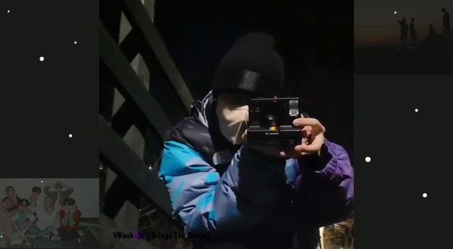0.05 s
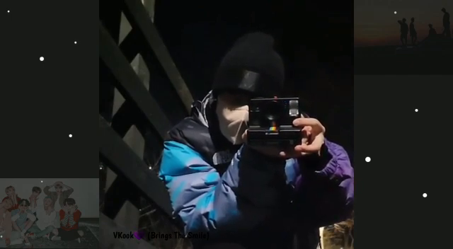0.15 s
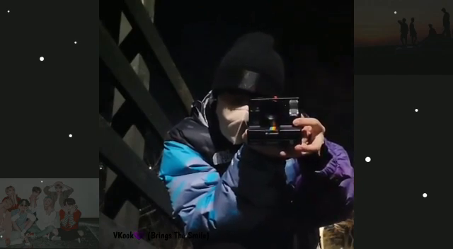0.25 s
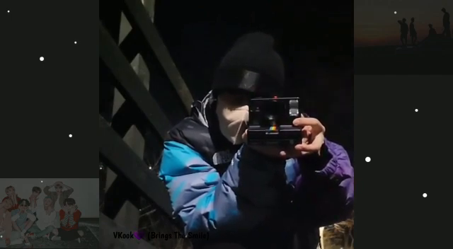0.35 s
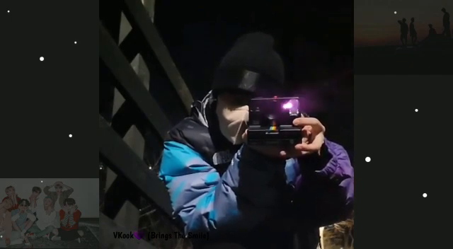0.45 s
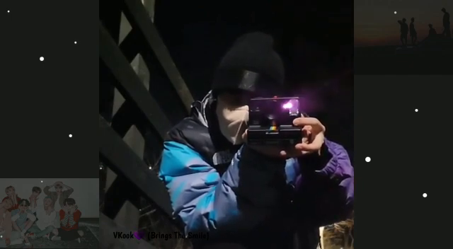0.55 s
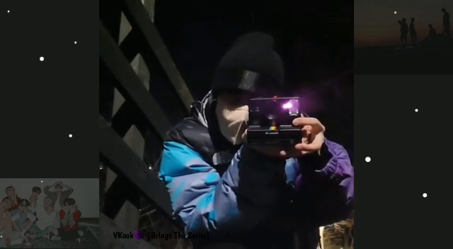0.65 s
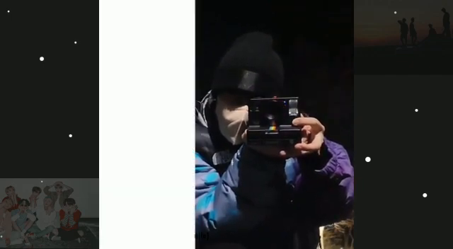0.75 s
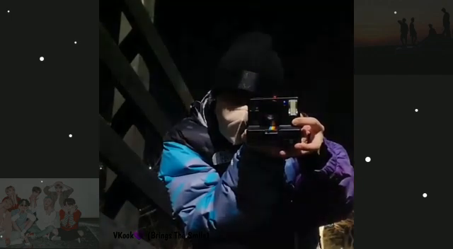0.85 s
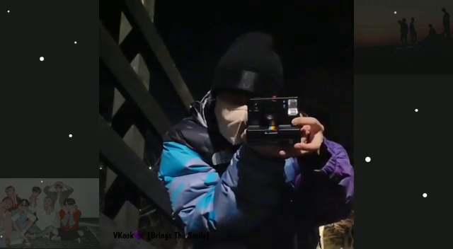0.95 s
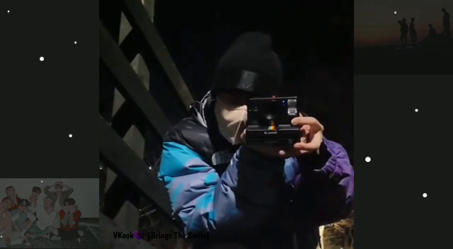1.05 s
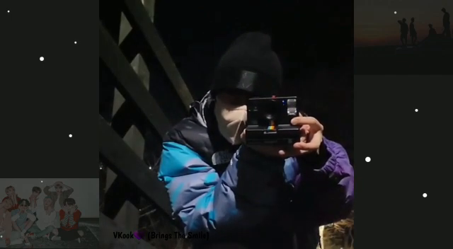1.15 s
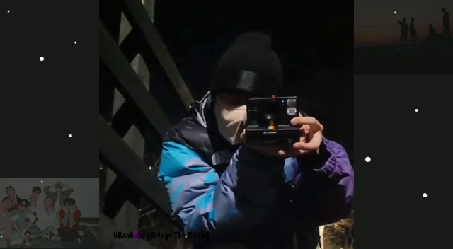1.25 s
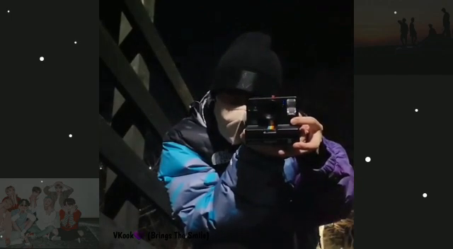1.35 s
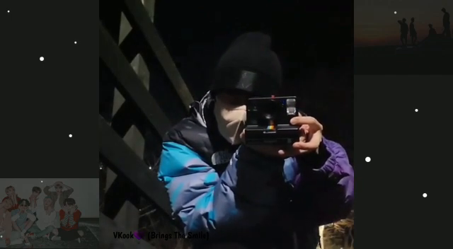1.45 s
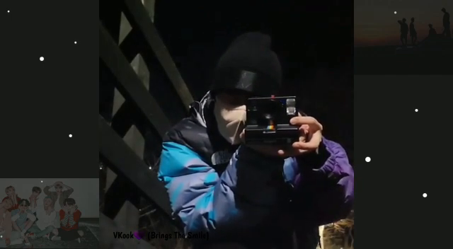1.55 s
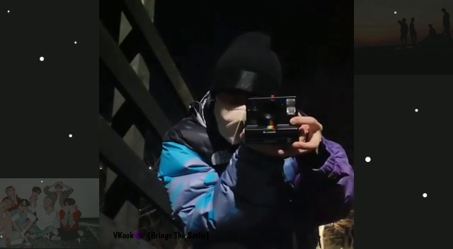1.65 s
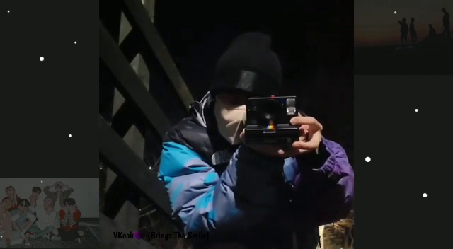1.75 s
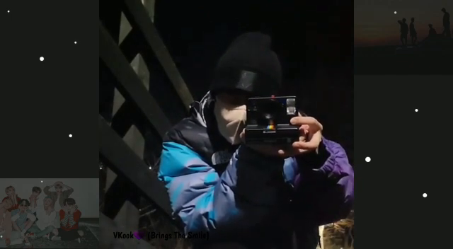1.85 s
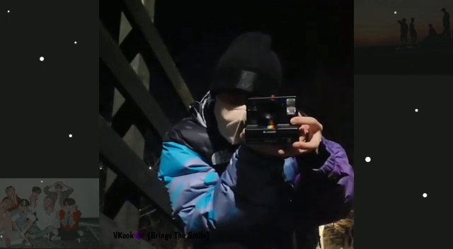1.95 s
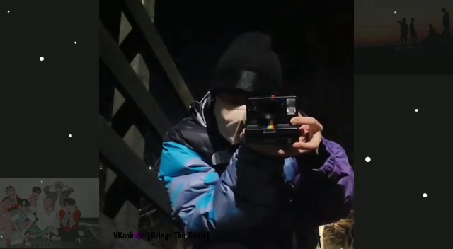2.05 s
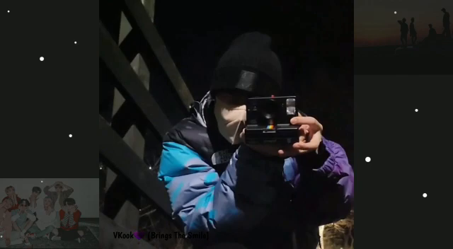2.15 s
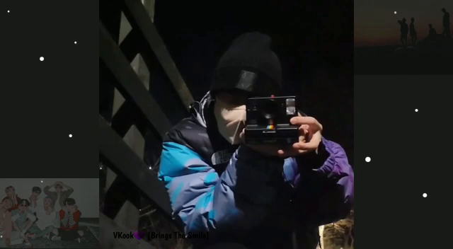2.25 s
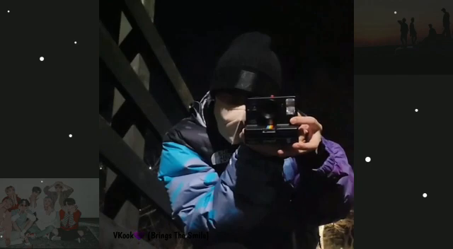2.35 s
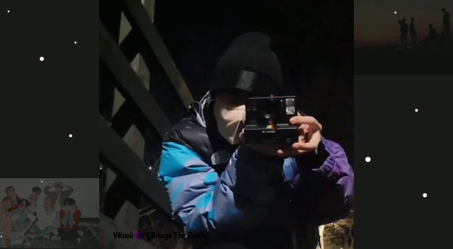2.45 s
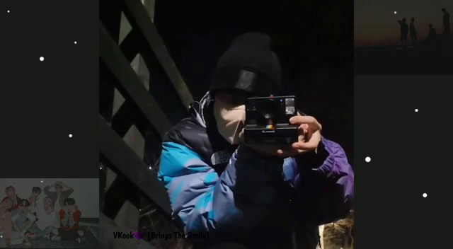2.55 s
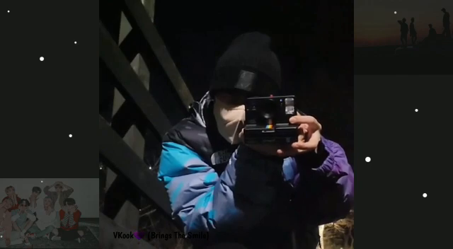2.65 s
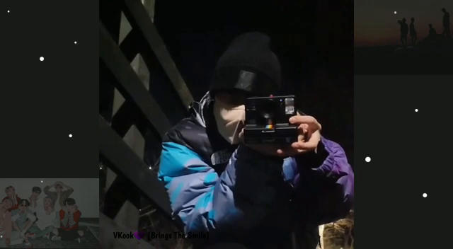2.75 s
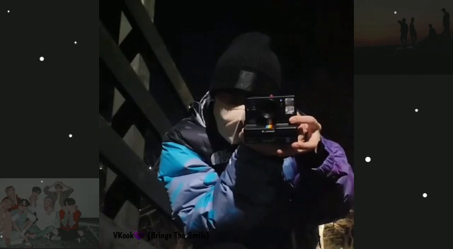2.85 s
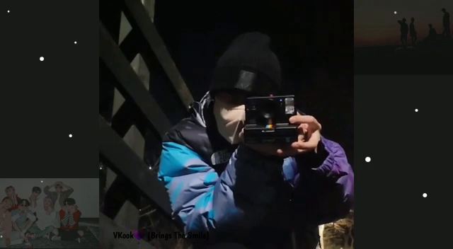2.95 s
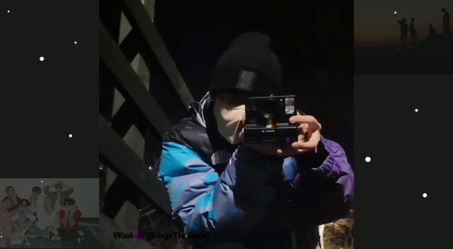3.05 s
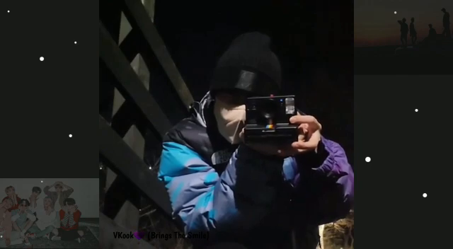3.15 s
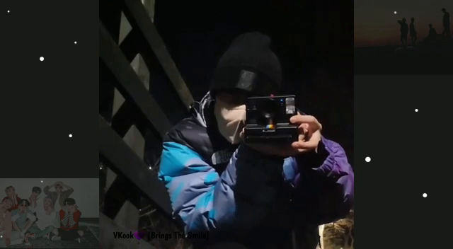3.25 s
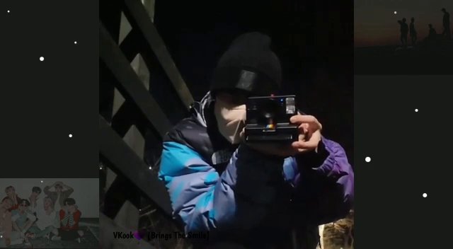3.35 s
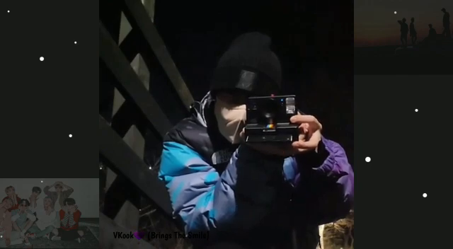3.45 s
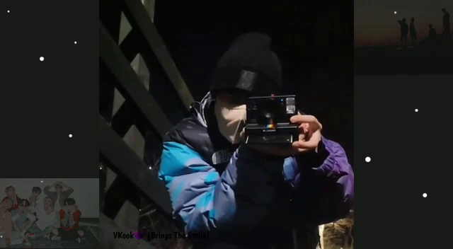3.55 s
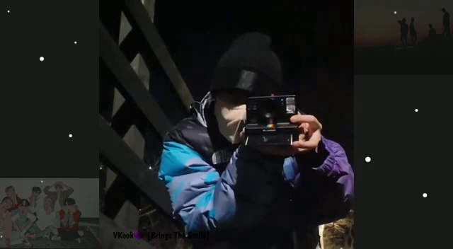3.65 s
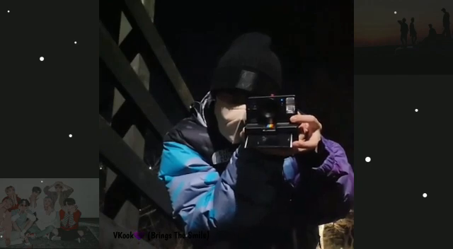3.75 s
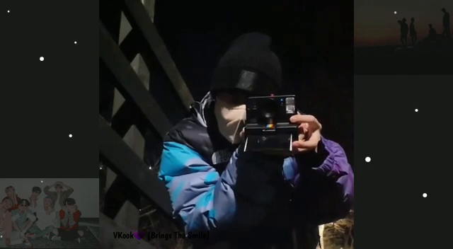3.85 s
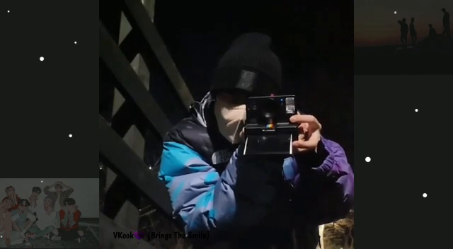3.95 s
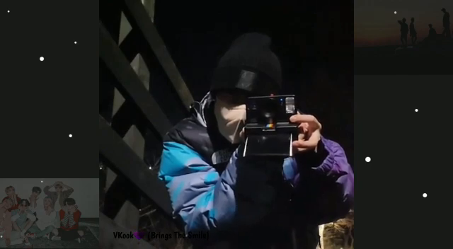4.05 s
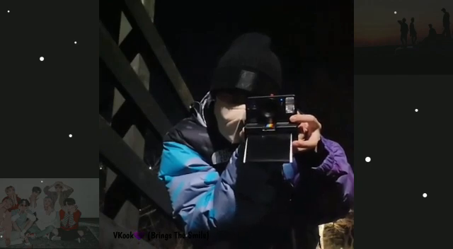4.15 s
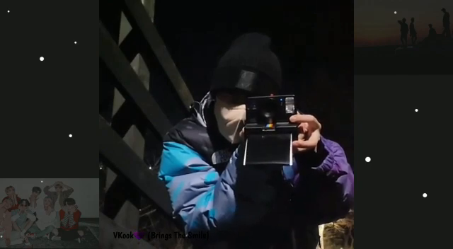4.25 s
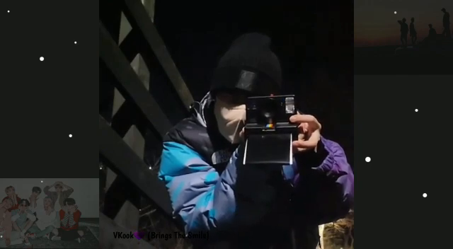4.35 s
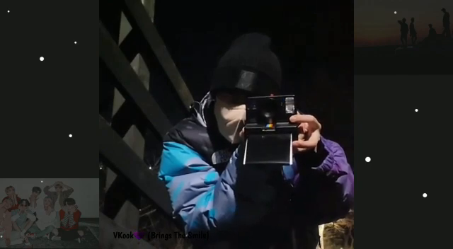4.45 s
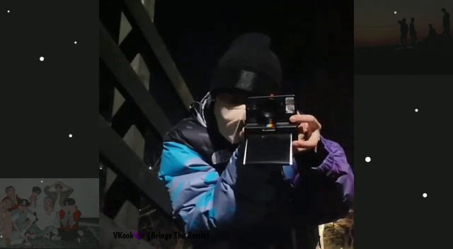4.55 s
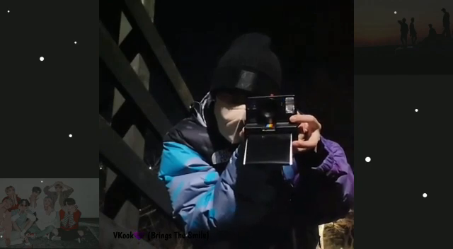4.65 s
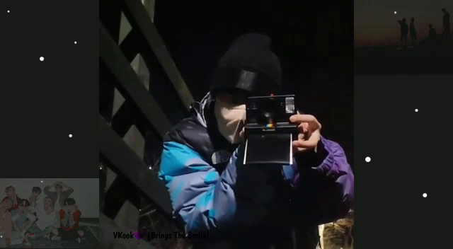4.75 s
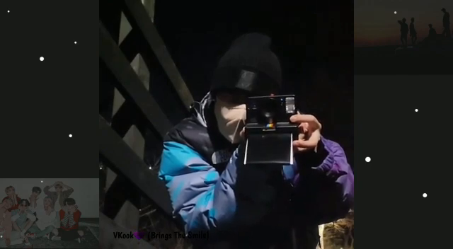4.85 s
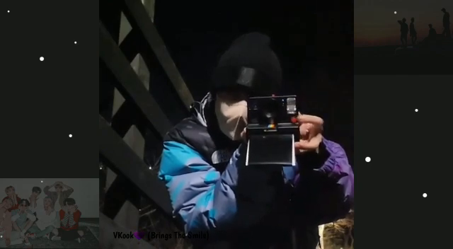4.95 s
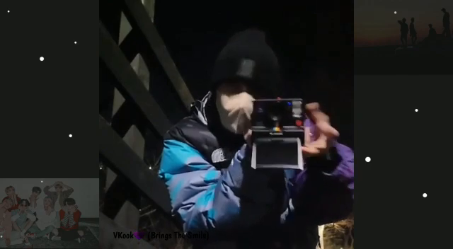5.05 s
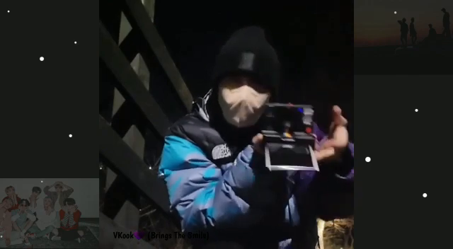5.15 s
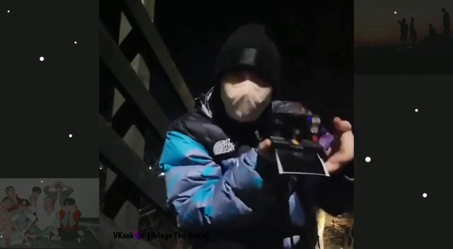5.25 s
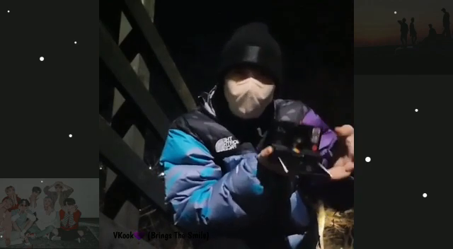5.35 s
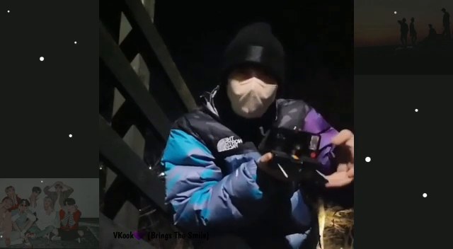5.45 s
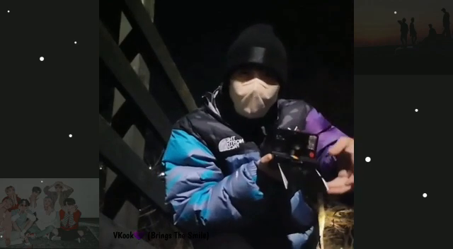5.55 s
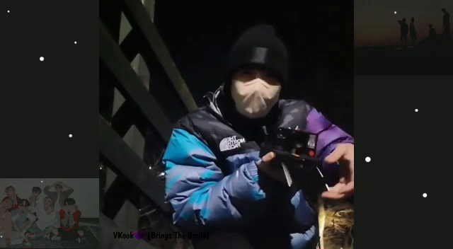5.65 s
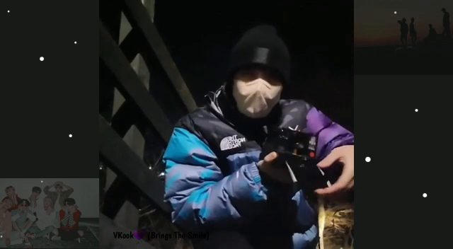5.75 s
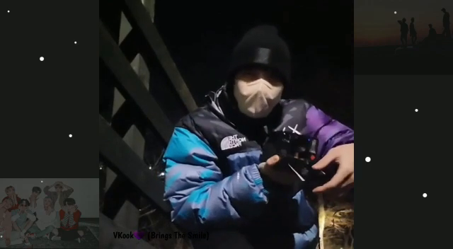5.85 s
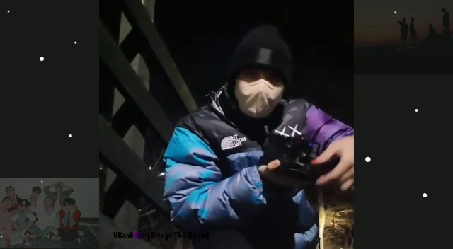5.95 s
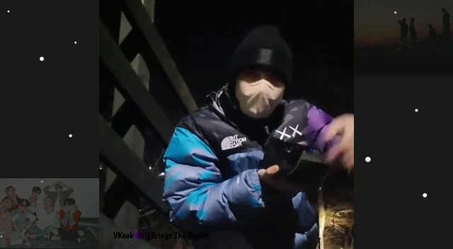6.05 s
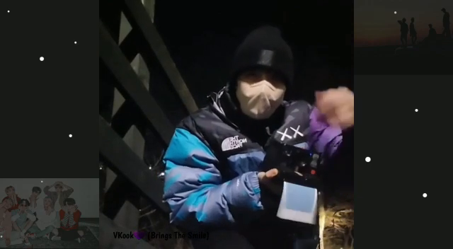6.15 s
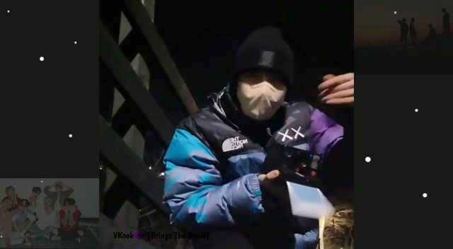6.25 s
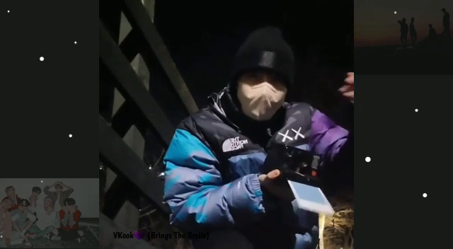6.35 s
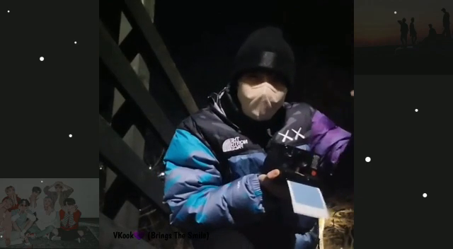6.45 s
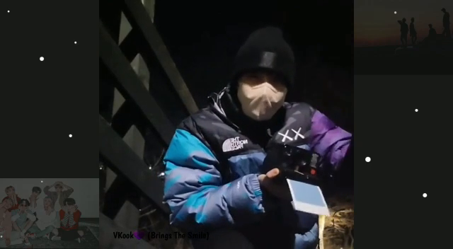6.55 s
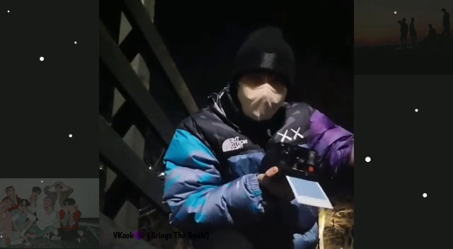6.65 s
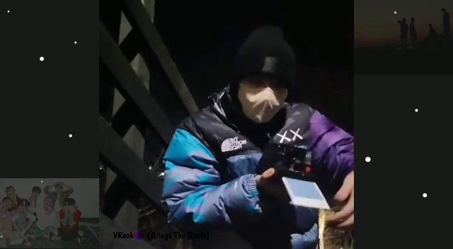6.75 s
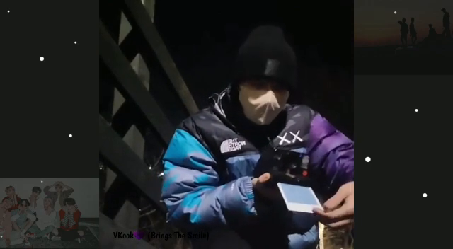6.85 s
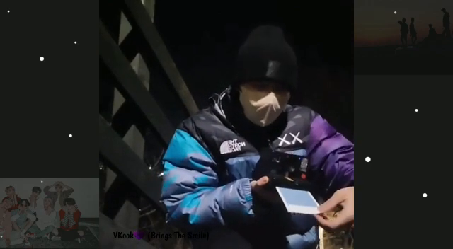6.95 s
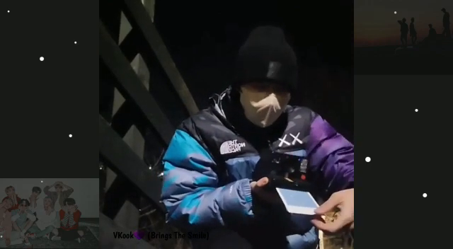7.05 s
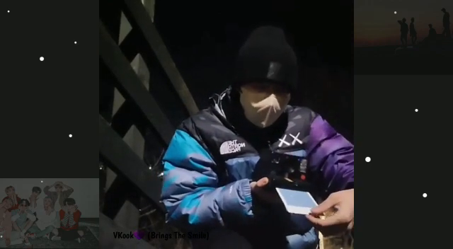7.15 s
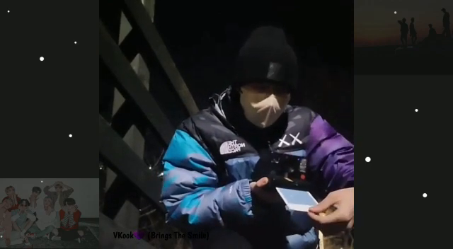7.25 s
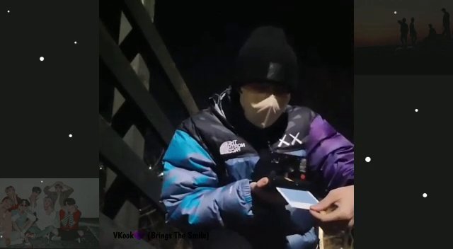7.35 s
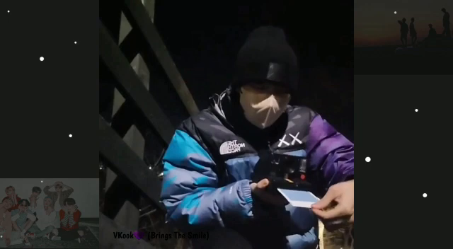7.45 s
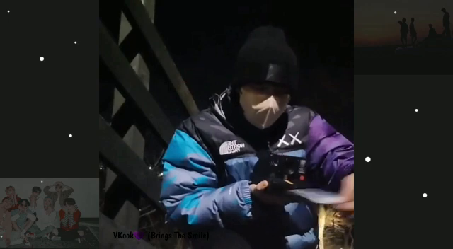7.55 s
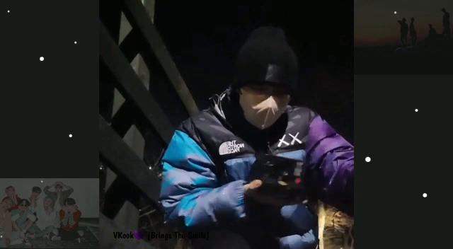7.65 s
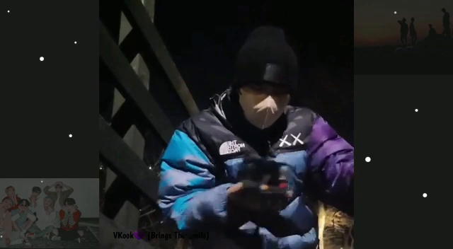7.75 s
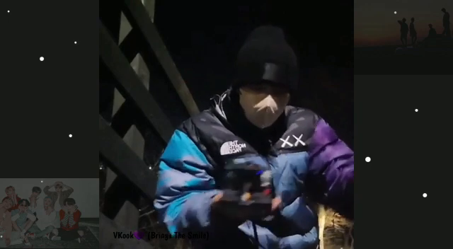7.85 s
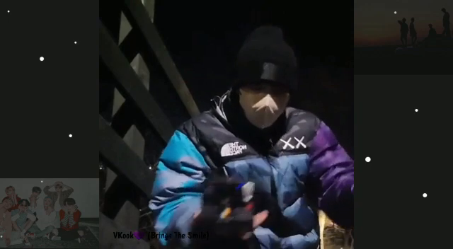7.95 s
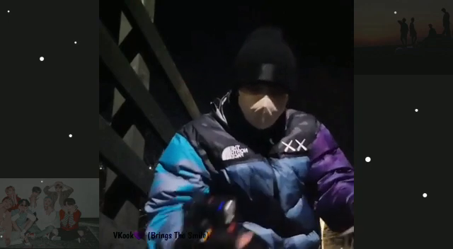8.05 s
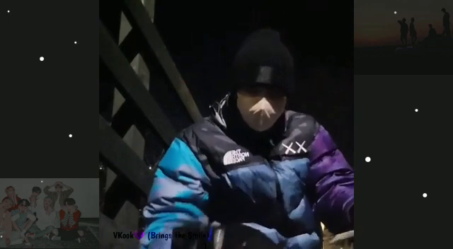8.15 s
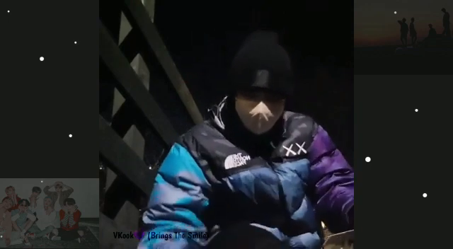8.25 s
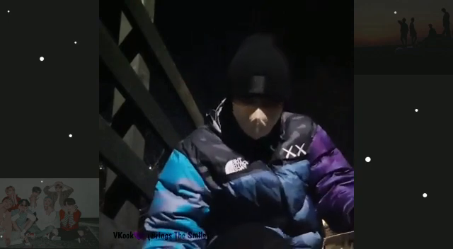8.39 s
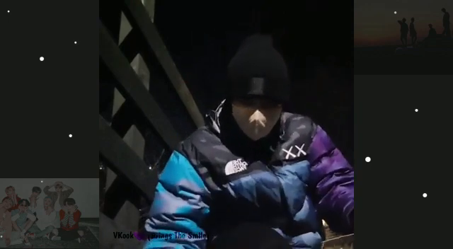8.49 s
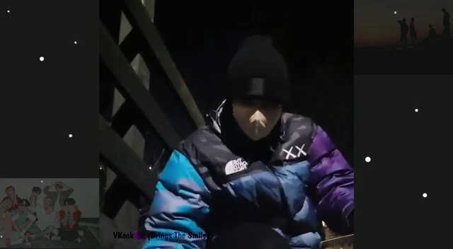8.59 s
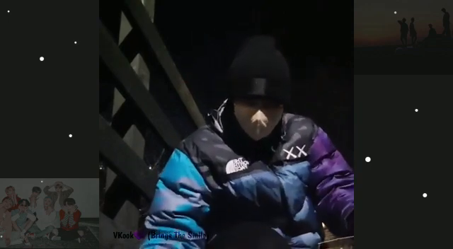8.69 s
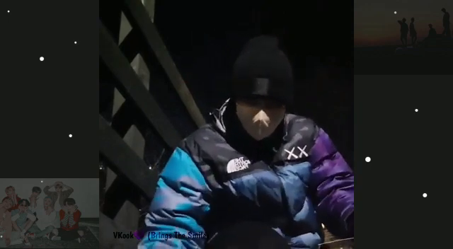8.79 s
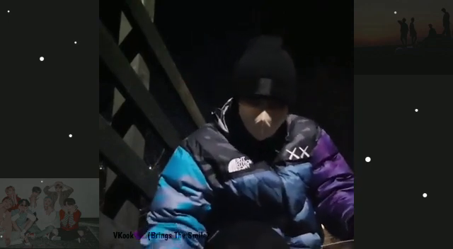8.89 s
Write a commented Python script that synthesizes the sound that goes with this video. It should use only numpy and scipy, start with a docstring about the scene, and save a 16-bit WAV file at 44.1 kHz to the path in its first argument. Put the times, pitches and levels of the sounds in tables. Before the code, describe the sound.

Quiet outdoor night with faint low traffic, heard close by a stereo microphone. Tiny shutter ticks come first, then after a pause a thin gear motor whirrs, drops in pitch at a sharp latch click, labours while rolling out a print, speeds up and dies. Afterwards a padded jacket rustles, the plastic camera clicks and knocks in the hands, ending with soft dull thumps.

```python
"""A small geared motor in an instant camera whines, bogs down, latches and rolls the print out, outdoors at night.
Shaft and tooth harmonics plus grinding noise make the motor; ringing modes make the shutter ticks before it.
Hands click and knock the plastic housing: short noise bursts, ringing modes and low decaying sines.
A padded jacket rustles in flickering noise bands; filtered noise makes far traffic, sines a brief hum and a
faint toot. A close two-port microphone hears it all."""
import sys
import numpy as np
from scipy import signal
from scipy.fft import rfft, irfft
from scipy.io import wavfile
from scipy.ndimage import uniform_filter1d

SR = 44100
rng = np.random.default_rng(int(sys.argv[2]) if len(sys.argv) > 2 else 0)


def invert_db(level):
    """Linear amplitude ratio for a level in decibels (20 dB per decade), elementwise."""
    return 10 ** (np.asarray(level, dtype=float) / 20)


def waveform_to_disk(signal):
    """Save audio, clipped to [-1, 1], as 16-bit WAV at the path in sys.argv[1]."""
    frames = np.transpose(np.atleast_2d(signal))
    scaled = np.clip(frames, -1, 1) * 32767
    samples = np.round(scaled).astype(np.int16)
    wavfile.write(sys.argv[1], SR, samples)


N = 393372
TOP_HZ = 12820
TEETH = 11


def unit(x):
    """Scale to rms 1."""
    return x / np.sqrt(np.mean(x ** 2))


def gain_at(hz, points):
    """Gain of a (Hz, dB) spectrum, interpolated over log frequency."""
    f, db = np.transpose(points)
    return invert_db(np.interp(np.log(np.maximum(hz, 1)), np.log(f), db))


def colour(x, points):
    """Filter by a (Hz, dB) spectrum."""
    size = x.shape[-1]
    hz = np.arange(size // 2 + 1) * SR / size
    return irfft(rfft(x) * gain_at(hz, points), size)


def band(x, lo_hz, hi_hz):
    """Causal band-pass."""
    return signal.sosfilt(signal.butter(2, [lo_hz, hi_hz], "band", fs=SR, output="sos"), x)


def columns(table, t):
    """Curves read at times t."""
    s, *rest = np.transpose(table)
    return [np.interp(t, s, c) for c in rest]


def walk(rate_hz, size=N):
    """Slow chance of rms 1: random steps, smoothed twice."""
    k = int(SR / rate_hz)
    steps = np.repeat(rng.standard_normal(size // k + 1), k)
    return unit(uniform_filter1d(uniform_filter1d(steps, k), k)[:size])


def decay(t, t60_s):
    """Exponential fall of 60 dB in t60_s."""
    return np.exp(-np.log(1000) * t / t60_s)


def ports(x, pan_db=0., lag=11):
    """The right port is nearer: the left hears x lag samples later, pan_db louder than the right."""
    left = np.pad(x, (lag, 0), "edge")[:len(x)]
    return np.array([left * invert_db(pan_db / 2), x * invert_db(-pan_db / 2)])


def shaft_lines(turn, shaft_hz, load, coast, play):
    """Uneven rotor and gears repeat once a turn; the pattern shifts when the teeth bear load."""
    # Each row: shaft harmonic, relative level running free in dB, relative level loaded in dB.
    uneven = [(4.95, -25, 3.5), (6, 7.5, -11), (7, 8, -6.5), (9, -21, -0.5), (9.88, 9.5, 2), (11, 14, 11),
              (12, -1, 8.5), (13, 2, -4), (15, -0.5, 9.5), (17, 11.5, 3.5), (18, 14, -6), (19, 9, -9),
              (20, 8.5, -4.5), (21, 9, -3.5), (23, 9, -4), (25.53, -21, 10), (26, -15, 8.5), (27, -21, -5),
              (39, 15, 3), (77.6, 6, 13), (87.5, 1, 10.5)]
    strong = {k: (free_db, loaded_db) for k, free_db, loaded_db in uneven}
    size, out = len(turn), 0
    for k in sorted(set(range(4, 8 * TEETH + 1)) | set(strong)):
        free_db, loaded_db = strong.get(k, (-4., -4.))
        db = free_db + load * (loaded_db - free_db) + 3.5 * walk(30, size) - 15 * coast
        phase = k * turn + 3.8 * play * walk(200, size) + rng.uniform(0, 2 * np.pi)
        out = out + invert_db(db) * (k * shaft_hz < TOP_HZ) * np.sin(phase)
    return out


def housing_whirr(shaft, turn, coast, slack, whirr_db):
    """Grinding noise and shaft harmonics through the housing; duller without drive, when teeth only brush."""
    # Each row: frequency in Hz, relative level in dB per Hz.
    housing = [(350, -32), (600, -14), (1460, -17.5), (1790, -30.5), (1990, -17.5), (2390, -14.5),
               (2650, -30.5), (2900, -12), (3260, -13.5), (6200, -14), (6400, -21.5), (6750, -19.5),
               (6950, -14.5), (10800, -12.5), (12500, -10.5), (13500, -39.5)]
    size = len(turn)
    grind = rng.standard_normal(size) * invert_db(2.4 * walk(700, size))
    grind *= 1 + 0.22 * np.sin(0.34 * turn)  # the larger wheel behind the pinion turns slower
    grind *= 1 + (0.082 + 0.18 * slack) * np.sin(turn)
    whirr = colour(grind + invert_db(-21.5) * shaft, housing)
    dull = colour(whirr, [(2500., 0.5), (3300., 2.5), (4500., -9), (7000., -1), (12000., -17)])
    whirr += coast * (dull - whirr)
    return whirr * invert_db(whirr_db) / np.sqrt(uniform_filter1d(whirr ** 2, SR // 5))


def tooth_whine(turn, shaft_hz, load, falter, slack, play, whirr_db):
    """Meshing teeth whine; an off-centre pinion adds side lines one shaft rate below and above each harmonic."""
    # Each row: tooth harmonic, free level in dB, loaded level in dB, both relative to the whirr.
    tooth_lines = [(2, -9, -1), (3, -20, -6), (4, -7, -2), (5, -11, -7), (6, -14, -4), (8, -16, -7)]
    # Resonances that a tooth harmonic lights up as it passes. # Each row: frequency in Hz, full width in Hz at
    # which the amplitude falls to half, gain in dB.
    gearbox = [(2870, 480, -8), (3385, 370, 5), (3770, 360, -2.5), (4180, 500, -16), (5280, 260, -2),
               (5990, 520, 4.5), (6960, 1100, 3), (8016, 400, -7), (8790, 77, -17.5), (9820, 220, 0),
               (10950, 1200, 6)]
    size, whine = len(turn), 0
    flutter_db = 3 - 1.5 * load + 1.5 * falter  # steadier under load, broken when stumbling
    for k, free_db, loaded_db in tooth_lines:
        mesh = round(k) * (TEETH * turn + play * walk(400, size))  # play blurs the higher lines more
        mesh_hz = round(k) * TEETH * shaft_hz
        lit = sum(invert_db(db) / np.hypot(1, 2 * (mesh_hz - hz) / width_hz) ** 2 for hz, width_hz, db in gearbox)
        db = whirr_db + free_db + load * (loaded_db - free_db)
        db = db + flutter_db * walk(90, size) + (k - 2) * walk(12, size)  # higher lines also come and go
        # a stumble strains the low lines and dulls each higher one further
        db = db + (1 - 2 * max(k - 3, 0)) * falter - 16.0 * slack
        lines = np.sin(mesh) + invert_db(-13) * np.sin(mesh - turn) + invert_db(-16) * np.sin(mesh + turn)
        whine = whine + np.sqrt(2) * lit * invert_db(db) * lines
    return whine


def motor():
    """One shaft speed curve drives load, stumbling and tooth play, and through them whirr and whine."""
    # Spin-up, free run, pick-up of the sheet, latch, rolling, release, run-out.
    # Each row: time in seconds, shaft speed in Hz.
    speed = [(2.16, 146), (2.195, 154), (2.24, 180), (2.31, 187), (2.545, 189), (2.66, 184.3), (2.97, 183),
             (2.99, 177), (3.025, 143), (3.09, 131), (3.135, 116), (3.23, 115), (3.28, 126.5), (3.31, 109),
             (3.345, 124), (3.405, 132.2), (3.85, 139.4), (4.2, 150), (4.288, 150.5), (4.335, 106),
             (4.362, 125), (4.42, 180), (4.465, 188), (4.535, 173.6), (4.605, 135), (4.695, 121.6)]
    # Each row: time in seconds, whirr level in dB.
    effort = [(2.16, -69), (2.18, -54.5), (2.26, -50), (2.8, -46.5), (3.1, -49), (3.21, -53), (3.26, -51.5),
              (3.32, -55.5), (3.38, -49), (3.6, -50), (4.31, -48), (4.43, -51), (4.56, -51), (4.62, -64),
              (4.665, -73.5), (4.695, -88)]
    pick_up_s, power_off_s = 2.9, 4.48
    released_s = 4.375  # the rollers let go of the sheet and the teeth run slack
    falter_hz_per_s, labours_hz = 500, 128  # teeth stumble when speed changes this fast or sinks below this
    pressed_play_rad, free_play_rad, falter_play_rad = .13, .17, .07  # phase play; the last is added

    start, end = (int(s * SR) for s in (speed[0][0], speed[-1][0]))
    size, t = end - start, np.arange(start, end) / SR
    # the rotor's inertia rounds each change
    shaft_hz = uniform_filter1d(columns(speed, t)[0], size=SR // 70, mode="nearest")
    whirr_db, = columns(effort, t)
    turn = 2 * np.pi * np.cumsum(shaft_hz * (1 + .0016 * walk(90, size))) / SR
    load = np.clip((175 - shaft_hz) / 22, 0, 1) * (t > pick_up_s)
    coast = np.clip((t - power_off_s) / .05, 0, 1)
    slack = np.clip((t - released_s) / .02, 0, 1)
    speed_change = np.abs(np.gradient(shaft_hz)) * SR / falter_hz_per_s
    falter = np.clip(speed_change + (labours_hz - shaft_hz).clip(0) / 8, 0, 1)
    play = free_play_rad + load * (pressed_play_rad - free_play_rad) + falter * falter_play_rad

    shaft = shaft_lines(turn, shaft_hz, load, coast, play)
    whirr = housing_whirr(shaft, turn, coast, slack, whirr_db)
    whine = tooth_whine(turn, shaft_hz, load, falter, slack, play, whirr_db)
    out = np.zeros(N)
    out[start:end] = (whirr + whine) * np.minimum(1, np.arange(size) / 300)
    left, right = ports(out, lag=10)
    # the left port lies in the shade of the treble
    left = colour(left, [(700., -3), (2200., 3), (4000., 1.5), (7000., -2), (11000., -8)])
    return np.array([left, right])


def shutter():
    """Thin blades snap and ring briefly, each tick striking their modes differently."""
    # Each row: time in seconds, level in dB, extra level of modes above 10 kHz in dB.
    ticks = [(0.9785, -67, -10), (0.985, -57, -10), (0.990, -54, -10), (0.9973, -58, -10),
             (1.0045, -55, -8), (1.0503, -51, -10), (1.0541, -47, 9), (1.058, -58, -3), (1.0625, -62, -3)]
    # Each row: nominal mode frequency in Hz, mean level in dB, 60 dB decay in seconds.
    blades = [(3900, -16, 0.0037), (5350, 3, 0.0094), (8300, -7, 0.0043), (12100, 3.5, .009)]
    out, t = np.zeros(N), np.arange(SR // 30) / SR
    for s, db, top_db in ticks:
        ring = 0
        for hz, mode_db, t60_s in blades:
            a, b = rng.standard_normal(2)
            gain = invert_db(mode_db + 2.8 * a + top_db * (hz > 10000))
            ring = ring + gain * np.sin(2 * np.pi * hz * (1 + 0.034 * b) * t) * decay(t, t60_s)
        snap = invert_db(2) * np.diff(rng.standard_normal(len(t) + 1)) * np.exp(-t / .0008)
        at = int(s * SR)
        out[at:at + len(t)] += invert_db(db) * (ring + snap)
    return ports(out, -3.0, lag=10)


def clicks():
    """A faint scrape, then a short rattle of tiny impacts that cracks in the air and rings the plastic shell."""
    # Each row: time in seconds, rattle length in seconds, low knock in dB, crack in dB, treble in dB,
    # left minus right in dB before each band takes its share.
    blows = [(0.983, 0.0051, -67, -64, -74, -15), (0.996, 0.0011, -58, -59.5, -60, -11),
             (1.0535, .001, -65, -55, -59, -17), (3.135, .001, -54, -53, -62, -6),
             (3.154, 0.0022, -39, -34, -32.5, -23), (3.173, .002, -56, -44, -41, 9),
             (3.189, 0.00093, -56, -48, -45, -6), (3.28, 0.0024, -51, -53.5, -53, -24),
             (3.486, .001, -64, -51, -68, -8), (4.3772, 0.0077, -40, -38.5, -44, -20),
             (5.902, 0.0012, -65, -64.5, -57, -6), (6.270, 0.003, -58, -51, -52, -9),
             (6.2753, 0.0054, -46, -30.5, -29.5, -9), (6.288, 0.0073, -43.5, -43.5, -48.5, 14.5),
             (7.093, 0.0026, -73, -71, -70, -3), (7.7067, 0.0033, -39.5, -52, -52, -3),
             (7.7129, 0.00078, -29, -27.5, -34.5, -9), (7.721, 0.0019, -41, -48, -43, 10),
             (8.119, .001, -57, -62.5, -74, -3), (8.3815, 0.00087, -72, -67, -61, -3),
             (8.589, .001, -58.5, -70, -88, 1), (8.8753, 0.0011, -54.5, -59.5, -64, -3)]
    # Each row: nominal mode frequency in Hz, mean relative level in dB, 60 dB decay in seconds.
    shell = [(760, -8.5, 0.012), (1004, -7, 0.02), (1328, -6.5, 0.0098), (2328, 4, 0.006),
             (3360, 4.5, 0.006), (4260, 7.5, 0.005), (5210, 10.5, 0.0046), (7287, 11.5, 0.006)]
    lowered_s = 5.2  # the camera is brought down to the lap
    out, lead = np.zeros((2, N + SR)), SR // 80
    t = (np.arange(SR // 5) - lead) / SR
    ring_t, after = t - t[0], np.maximum(t, 0)
    for s, lasts_s, low_db, crack_db, treble_db, pan_db in blows:
        ring = 0
        for hz, db, t60_s in shell:
            a, b = rng.standard_normal(2)  # the grip shifts the modes a little at every blow
            mode = np.sin(2 * np.pi * hz * (1 + 0.029 * b) * ring_t)
            ring = ring + invert_db(db + a) * mode * decay(ring_t, t60_s)
        fade = decay(np.maximum(t - lasts_s, 0), 0.015) * (1 - np.exp(-after / 0.00023))
        fade += invert_db(-27) * np.exp(-np.abs(t) / .004)  # the scrape
        rattle = rng.standard_normal(len(t)) * invert_db(2.5 * rng.standard_normal(len(t))) * fade
        struck = unit(rattle) + invert_db(-10.5) * unit(signal.fftconvolve(rattle, ring)[:len(t)])
        at = int(s * SR) - lead
        # low Hz, high Hz, dB, share of the pan: hand and housing shade the treble more than the knock
        parts = ((280, 620, low_db - 13.5, .1), (620, 1300, low_db, .1), (1300, 2700, crack_db - 1.5, .2),
                 (2700, 6500, crack_db, .3), (6500, 13500, treble_db, .6))
        for k, (lo_hz, hi_hz, db, shade) in enumerate(parts):
            part = (-1) ** k * band(struck, lo_hz, hi_hz)
            part = invert_db(db) * part / np.std(part[lead:lead + SR // 140])
            out[:, at:at + len(t)] += ports(part, shade * pan_db, lag=10 if s < lowered_s else 11)
    return out[:, :N]


def thumps():
    """Soft dull knocks of a hand: a few low cycles."""
    # Each row: time in seconds, initial level in dB, frequency in Hz.
    knocks = [(3.155, -45, 332), (4.379, -42.5, 306), (4.784, -65, 190), (6.291, -38, 316),
              (6.743, -52, 226), (7.712, -32.5, 274), (8.876, -38, 324), (8.89, -35, 292),
              (8.909, -37, 297)]
    out, t = np.zeros(N + SR), np.arange(SR // 8) / SR
    for s, db, hz in knocks:
        at = int(s * SR)
        out[at:at + len(t)] += invert_db(db) * np.sin(2 * np.pi * hz * t) * np.exp(-t / 0.0063)
    return ports(out[:N], 1.1)


def scrapes():
    """Small folds scrape: short husky grains of uneven size, scattered in time and pitch."""
    per_s, fall_s = 900, .004
    out = 0
    for hz in 1500 * 1.2 ** np.arange(9):
        starts = rng.exponential(size=N) * (rng.random(N) < per_s / 9 / SR)
        shape = signal.lfilter([1], [1, -np.exp(-1 / (fall_s * SR))], starts)
        out = out + unit(band(shape * rng.standard_normal(N), hz, 1.25 * hz))
    return unit(out)


def jacket():
    """Nylon rubbing: a fine wide hiss of countless tiny slips that flickers; each movement swells and fades."""
    # Movements of the arms.
    # Each row: start in seconds, end in seconds, relative level at the start in dB, at the end in dB.
    movements = [(5.158, 5.362, -78, -69.5), (5.416, 5.7, -60, -64), (5.74, 5.894, -71, -64),
                 (5.928, 6.17, -65.5, -70), (6.218, 6.303, -63.5, -52.5), (6.918, 7.127, -68.5, -67.5),
                 (7.76, 7.88, -65, -64), (7.894, 8.313, -61.5, -58), (8.354, 8.61, -60.5, -68.5),
                 (8.65, 8.922, -71, -68)]
    # Each row: frequency in Hz, relative level in dB per Hz.
    cloth = [(500, -14.5), (1200, -0.5), (2370, -4), (2640, -10), (3200, -6), (4520, -6.5), (5370, -3.5),
             (11700, -8.5), (13000, -8.5), (13500, -38)]
    swell_db_per_s, fade_db_per_s = 134, 146
    crinkles_per_s, crinkle_boost = 400, .6  # mean boost over the hiss
    t = np.arange(N) / SR
    curves = []
    for start, end, start_db, end_db in movements:
        level_db = np.interp(t, (start, end), (start_db, end_db))
        level_db = level_db - swell_db_per_s * np.maximum(start - t, 0)
        curves.append(level_db - fade_db_per_s * np.maximum(t - end, 0))
    db = np.max(curves, axis=0)

    slips = rng.standard_normal((3, N)) * invert_db(3.3 * rng.standard_normal((3, N)))
    snaps = rng.exponential(size=N) * (rng.random(N) < crinkles_per_s / SR)
    slips[0] *= 1 + crinkle_boost * uniform_filter1d(snaps, size=40) * 40  # a crease snaps for about 1 ms
    rustle = 0
    for k, hz in enumerate(700 * 1.2 ** np.arange(17)):  # each band flickers alone
        rustle = rustle + (-1) ** k * band(slips, hz, 1.2 * hz) * invert_db(2.6 * walk(40))
    rustle[0] += invert_db(-3) * np.std(rustle[0]) * scrapes()
    near, left, right = unit(colour(rustle, cloth)) * invert_db(db + 1.2 * walk(25) + 1.2 * walk(150))
    wide = colour(np.array([left, right]), [(4000., -1.5), (9000., 2)])
    return 0.51 * ports(near, -0.6, lag=14) + wide


def surroundings(x, t60_s=0.097, wet_db=-10):
    """Scattered echoes from ground, steps and body, different at each port: decaying noise convolved."""
    t = np.arange(SR // 3) / SR
    echo = unit(rng.standard_normal((2, len(t))) * decay(t, t60_s)) / np.sqrt(len(t))
    return x + invert_db(wet_db) * signal.fftconvolve(x, echo, axes=1)[:, :N]


def traffic():
    """A far drone, alike at both ports in the bass and loose above, over a deep rumble."""
    # Each row: time in seconds, drone level in dB, rumble level in dB.
    levels = [(0.0, -53.5, -48.5), (0.5, -57.5, -53.5), (3.7, -53.5, -53), (7.1, -59, -60.5),
              (8.92, -54.5, -57.5)]
    # Each row: frequency in Hz, relative level in dB per Hz.
    town = [(47, -47.5), (80, -7.5), (193, -6.5), (244, -6.5), (316, -14.5), (409, -14.5), (552, -20.5),
            (601, -23.5), (729, -21.5), (1170, -28), (1680, -49.5), (7090, -58), (9580, -51.5),
            (13500, -54)]
    drone_db, rumble_db = columns(levels, np.arange(N) / SR)
    noise = rng.standard_normal((3, N))
    shared = ports(colour(noise[0], [(500., -1.0), (2500., -13.0)]), 0.9)
    loose = colour(noise[1:], [(250., -11.5), (2500., -2.0)])
    drone = invert_db(drone_db + walk(3)) * unit(colour(shared + loose, town))
    deep = unit(band(band(rng.standard_normal((3, N)), 42.0, 66.0), 30., 110.0))
    rumble = invert_db(rumble_db + 2.6 * walk(4)) * (ports(deep[0], 1.3) + 0.22 * deep[1:])
    return drone + rumble


def hum():
    """A brief low sine that throbs and dies."""
    hum_hz, hum_db, throb_hz, fade_start_s, fade_s = 239, -49.5, 5.4, 0.26, 0.05
    t = np.arange(N) / SR
    throb = np.abs(np.sin(np.pi * throb_hz * (t - .198))) ** 0.72
    fade = np.clip(0.93 + t / 0.12, 0, 1) * np.clip((fade_start_s - t) / fade_s + 1, 0, 1)
    return ports(np.sqrt(2) * invert_db(hum_db) * throb * fade * np.sin(2 * np.pi * hum_hz * t), 1.9)


def toot():
    """A short faint note far off: three sines with wavering phase."""
    start_s, length_s = 0.406, 0.069
    t = np.arange(N) / SR
    shape = np.sin(np.pi * np.clip((t - start_s) / length_s, 0, 1)) ** .5
    note = 0
    for hz, db in ((570, -61.5), (1490, -82), (1700, -71)):
        note = note + np.sqrt(2) * invert_db(db) * np.sin(2 * np.pi * hz * t + walk(69))
    return ports(shape * note)


def scene():
    """Camera and hands in their space, jacket and town around them."""
    camera = surroundings(motor(), t60_s=.06) + surroundings(shutter(), t60_s=0.032, wet_db=-4)
    hands = surroundings(clicks() + thumps())
    return camera + hands + jacket() + traffic() + hum() + toot()


def low_pass(x):
    """Removes everything above the highest recorded frequency."""
    return signal.sosfilt(signal.butter(12, 14180, fs=SR, output="sos"), x)


def record(dry):
    """A steep elliptic low-pass cuts the top."""
    mix = signal.sosfilt(signal.ellip(8, .2, 60, TOP_HZ, fs=SR, output="sos"), dry)
    return low_pass(mix)


dry = scene()
out = record(dry)
waveform_to_disk(out)
```